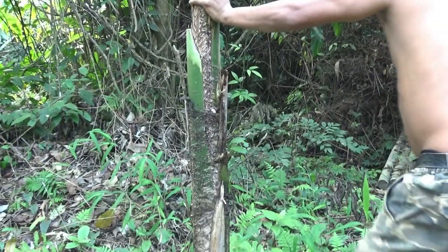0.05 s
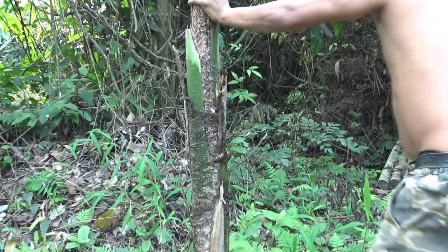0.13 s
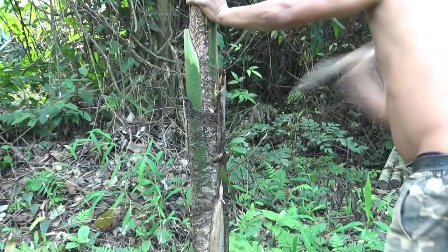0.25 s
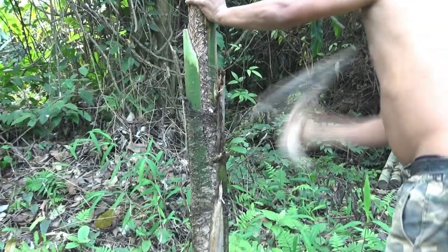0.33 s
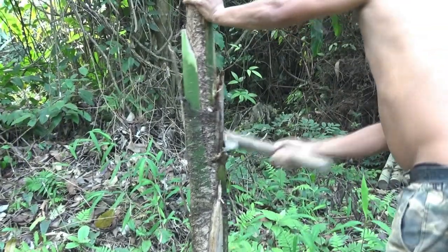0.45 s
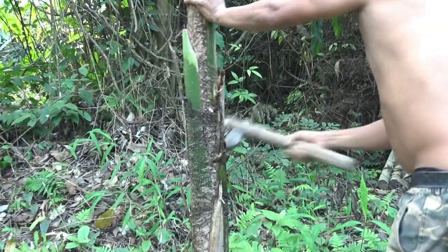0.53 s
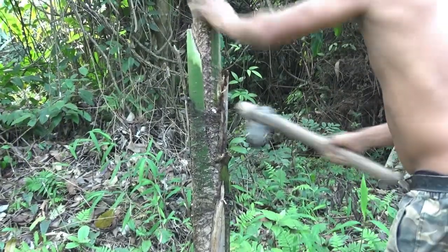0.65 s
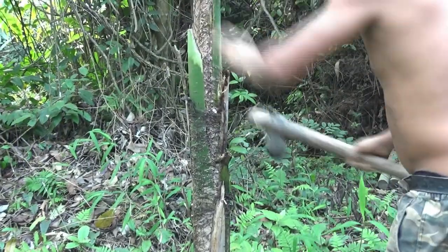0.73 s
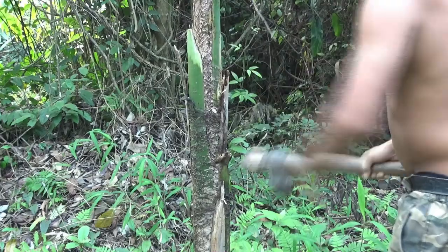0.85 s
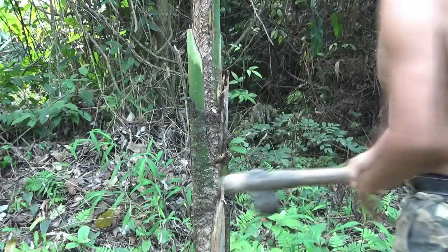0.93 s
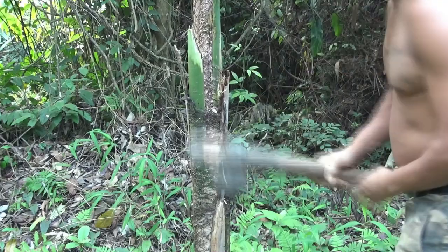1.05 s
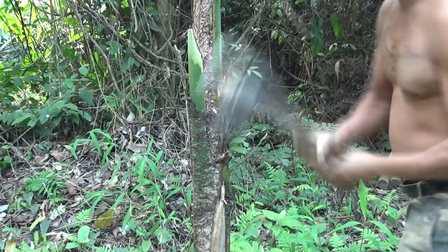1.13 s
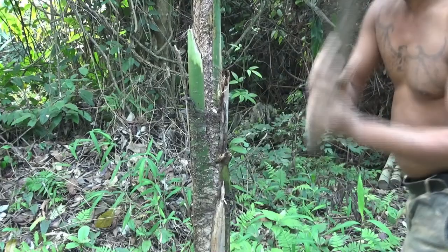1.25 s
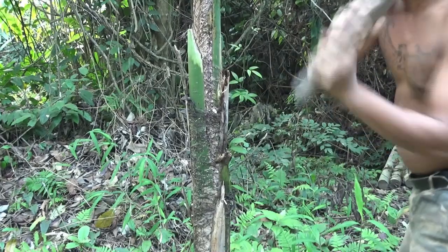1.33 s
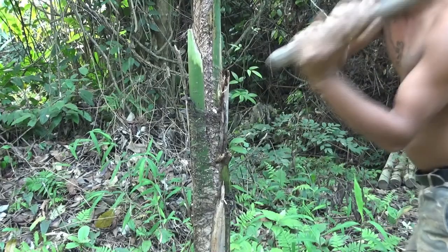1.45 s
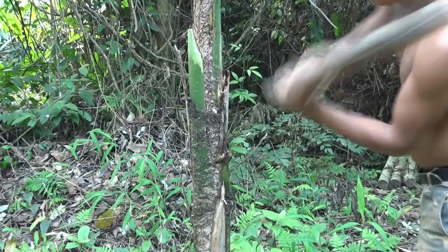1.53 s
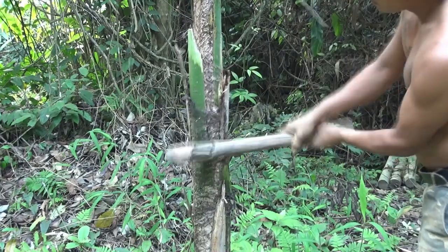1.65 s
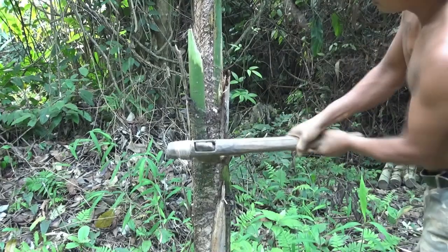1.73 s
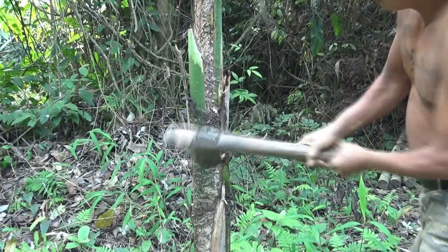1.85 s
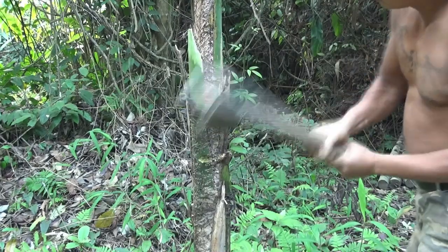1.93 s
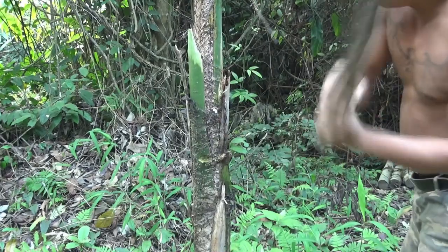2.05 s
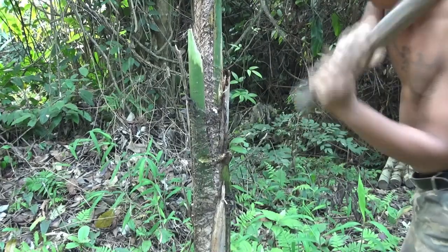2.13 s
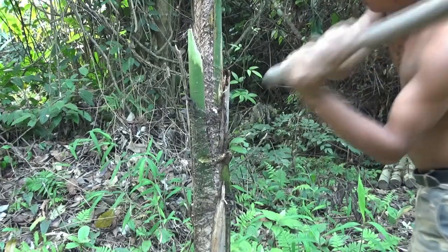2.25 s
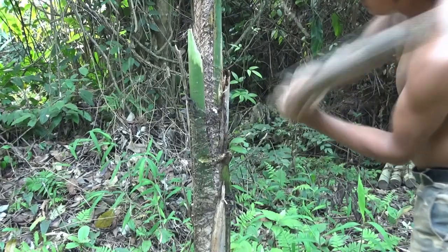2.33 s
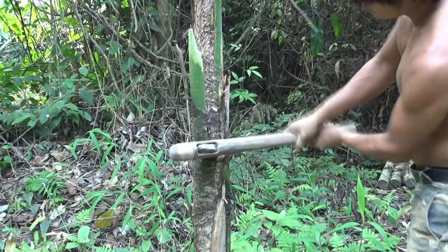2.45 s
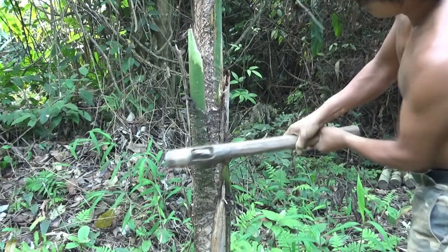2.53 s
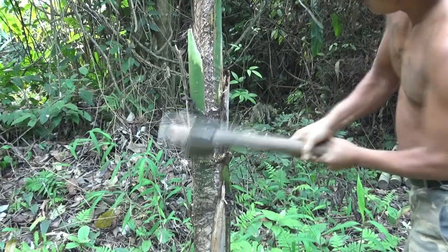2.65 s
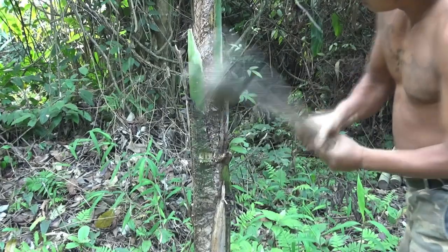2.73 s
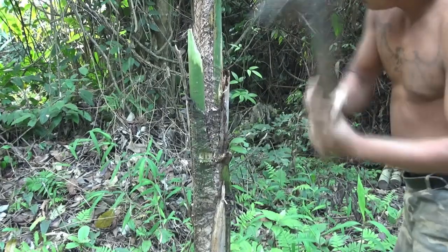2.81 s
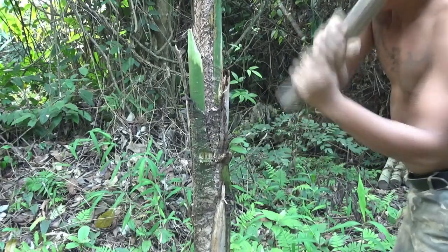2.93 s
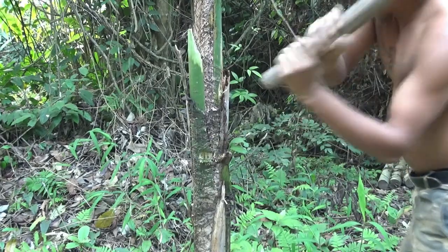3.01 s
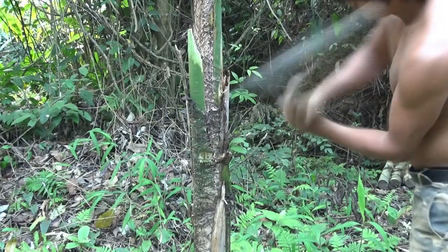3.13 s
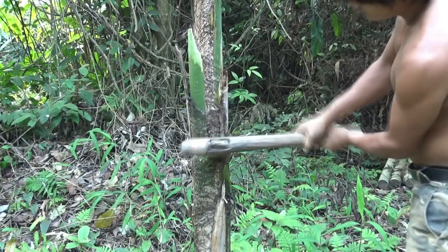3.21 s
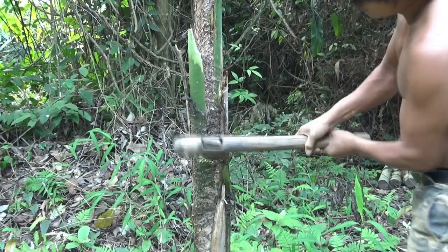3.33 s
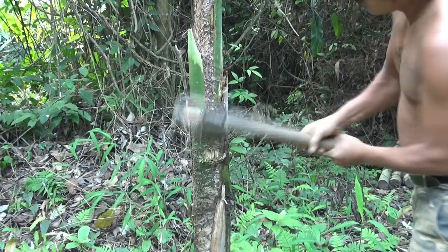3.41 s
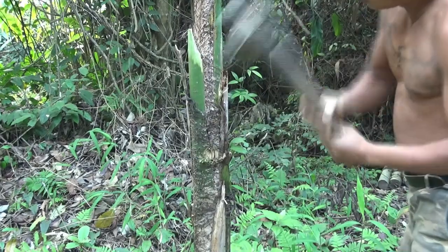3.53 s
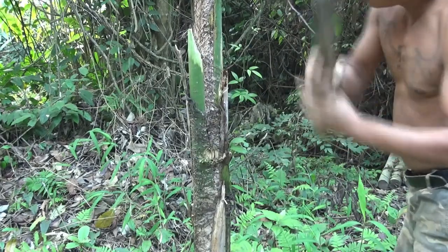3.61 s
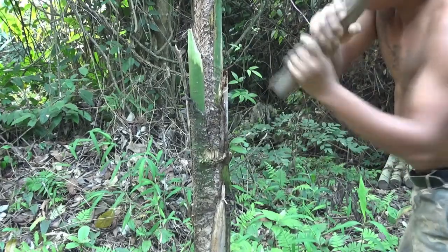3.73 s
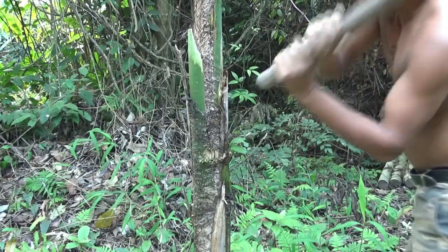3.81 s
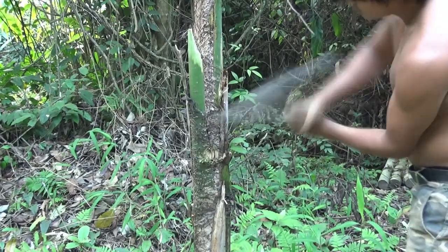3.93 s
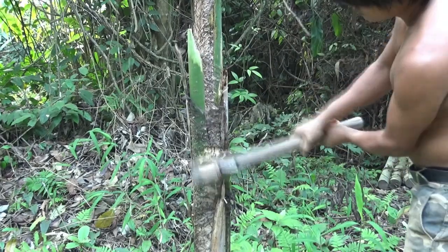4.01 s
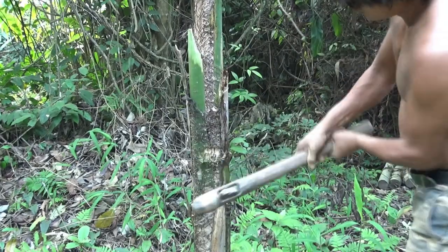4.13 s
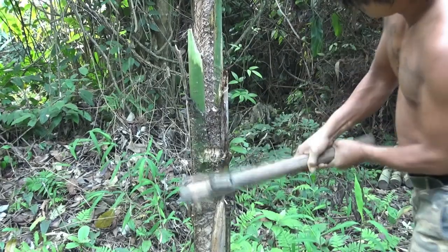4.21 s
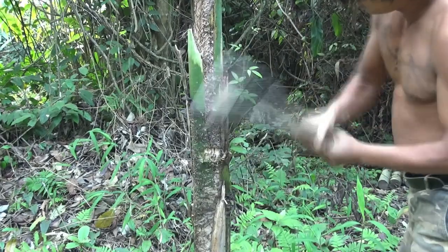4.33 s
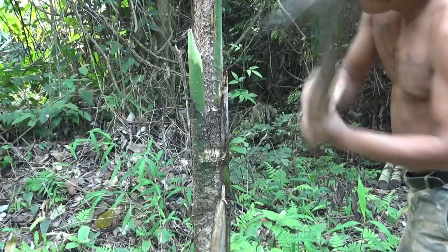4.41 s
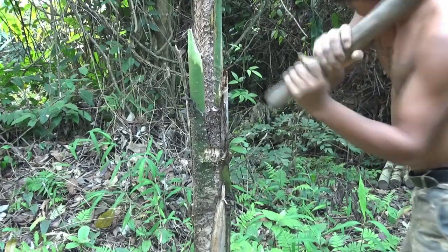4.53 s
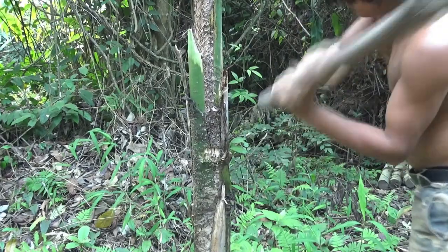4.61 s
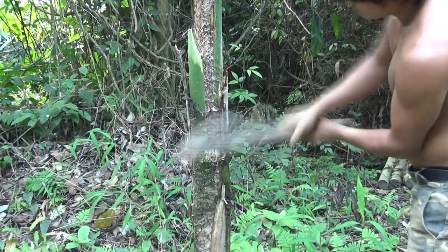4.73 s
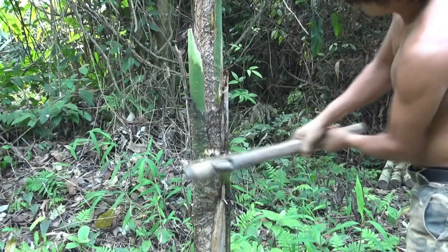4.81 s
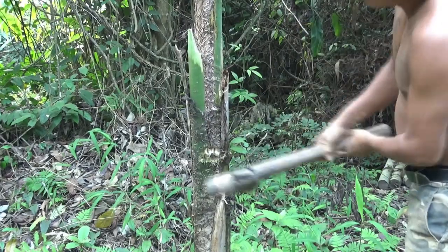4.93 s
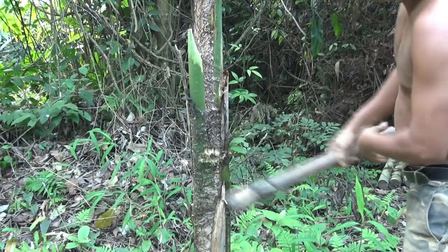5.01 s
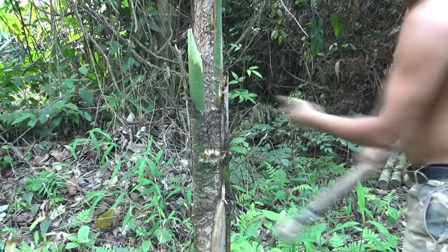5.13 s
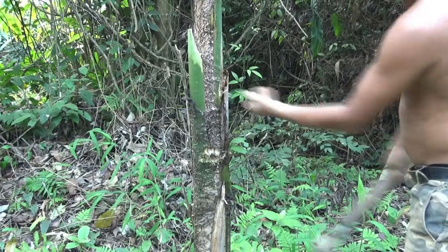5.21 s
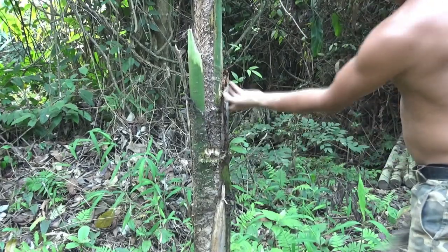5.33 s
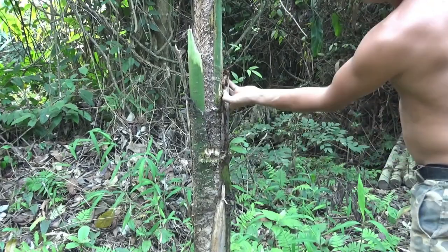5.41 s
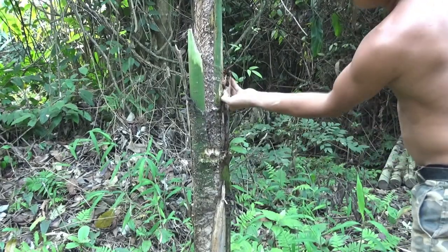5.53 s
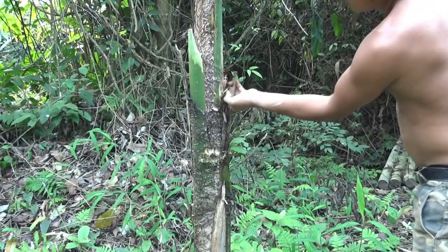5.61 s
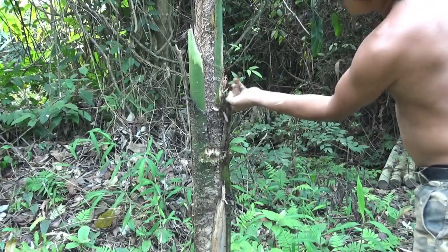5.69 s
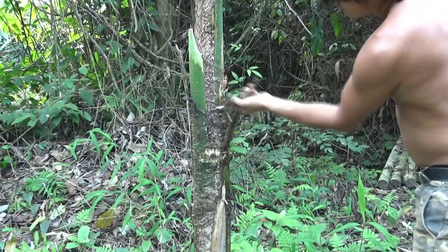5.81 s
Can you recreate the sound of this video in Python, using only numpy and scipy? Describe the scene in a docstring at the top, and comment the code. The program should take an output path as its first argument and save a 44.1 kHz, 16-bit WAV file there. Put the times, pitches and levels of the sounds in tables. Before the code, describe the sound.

In a quiet forest, a stone axe strikes a thin tree trunk close by. One knock comes first, then feet shuffle in dry leaves, and five sharp chops follow at a steady pace. Each blow echoes briefly among the trees, while twigs and chips snap in between. At the end, fingers pick at the bark with small crackles over a soft background hush.

```python
"""In a quiet wood, two steps away, a stone axe bites six times into a thin trunk.
Each blow crushes fibres and makes the trunk ring; the trees around throw the sound back
for most of a second. Feet shuffle in dry leaves, twigs and chips snap, and at the end
fingers pick at the bark. A soft hush lies under it all."""
import sys
import numpy as np
from scipy import signal
from scipy.io import wavfile
from scipy.ndimage import uniform_filter1d

SR = 44100
rng = np.random.default_rng(int(sys.argv[2]) if len(sys.argv) > 2 else 0)


def generate_wav(sig):
    """Save sig (samples, or channels by samples) to the path in sys.argv[1] as 16-bit PCM at SR."""
    pcm = np.round(np.clip(np.atleast_2d(sig).T, -1, 1) * 32767).astype(np.int16)
    wavfile.write(sys.argv[1], SR, pcm)


N = 258426

# Axe blows: t/s, crack level/dB, knock, thud and boom level/dB relative to the crack,
# favoured knock, thud and boom f/Hz, crushing time/s, echo level/dB
BLOWS = [(0.4371, -10.5, 8, -4, -26, 1830, 431, 248, 0.0069, -17.5),
         (1.7108, -1.5, -6, -14, -33, 1370, 890, 248, 0.0056, -18),
         (2.4956, 2, -7.5, -13, -33.5, 2150, 700, 199, 0.0037, -20),
         (3.266, 0.5, -6, -8.5, -31, 1250, 400, 185, 0.0039, -19.5),
         (4.0512, 1.5, -4.5, -16, -38.5, 2180, 570, 173, 0.0032, -17),
         (4.825, -6, 0.5, 1.5, -25.5, 2240, 780, 186, 0.005, -17.5)]
# Tones of the trunk: f/Hz, level/dB within its pitch group, 60 dB fade time/s
TRUNK_TONES = [(103, -6.5, 0.095), (144, 9.5, 0.044), (189.6, -11, 0.15), (303, 2, 0.13), (362, -1, .06),
               (452, 5, 0.088), (527, 26.5, 0.0057), (700, 8.5, 0.014), (820, 20.5, 0.015),
               (963, 15, 0.023), (1310, 15, 0.013), (1534, 7, 0.014), (1830, 21, 0.0044), (2240, 14, 0.017),
               (2440, 20, 0.011), (3400, 6, 0.0097), (4500, 15.5, 0.0096), (5340, 32, 0.0013),
               (7200, 6, 0.0027), (8000, 0, .002), (8980, 19.5, 0.0045), (12000, -30, .003)]
# How long the echo lasts: f/Hz, 60 dB fade time/s
ECHO_FADE = [(100, 0.86), (260, 0.58), (700, 0.73), (1840, 0.86), (4850, 1.06), (12800, 0.7)]
# Twigs, chips and bark breaking: t/s, level/dB, f/Hz, tick relative to ring/dB, left over right/dB
SNAPS = [(0.0582, -18, 2160, -3, 5), (0.161, -26.5, 1560, -5, 3), (0.1728, -20, 1900, 1, -3),
         (0.196, -26, 7850, 2, 0), (0.2862, -22.5, 2150, 8, -2), (0.5506, -19, 7500, 9, 2.5),
         (0.9894, -25, 3100, -7, -8), (1.211, -22, 7800, 4, -1.5), (1.2462, -10.5, 7210, -6, -1.5),
         (1.3234, -30, 8000, -5, 0), (1.4326, -25, 9150, -1.5, -4), (1.453, -26, 7500, -5, 3),
         (1.497, -38, 2640, 3, 0), (1.5774, -19.5, 7540, -1, 2), (1.5841, -21, 2000, 5, -8),
         (1.6, -20.5, 7340, -9, 1.5), (2.1304, -24, 1660, 0, -2.5), (2.3411, -32.5, 1450, -6, -1),
         (2.4206, -30.5, 7850, -7, 3), (2.9207, -21, 7660, -8, 2.5), (2.9344, -27, 4500, -12, -2.5),
         (3.7393, -33, 2340, 6, 0), (3.794, -26, 3400, -2, -1.5), (4.0756, -19, 2160, -5, -2.5),
         (4.4245, -32, 3220, 2, 0), (4.5184, -14.5, 2280, -9, 2.5), (4.5507, -27, 2750, -2.5, 0),
         (4.573, -32, 2700, -5, 0), (4.721, -25.5, 7900, 5, 4), (4.8497, -7, 3570, -7, 0),
         (4.8624, -7.5, 2060, -2, -1), (5.1971, -27.5, 2890, -7, 0), (5.2537, -28.5, 7400, -9, 5),
         (5.2975, -27.5, 6900, -5, 2.5), (5.3076, -27.5, 3500, -2.5, 4), (5.3632, -29.5, 2870, 6, 0),
         (5.3785, -24, 7830, -12, 4), (5.407, -31, 3100, 2.5, -2), (5.4408, -31, 3100, 1, -4),
         (5.4264, -30.5, 7740, -5, 0), (5.5004, -31.5, 4990, 1, 0), (5.5736, -31, 1920, 0, 0),
         (5.5935, -29, 7800, 6.5, -0.5), (5.6038, -29.5, 1900, 9, -1), (5.6552, -23, 1160, 5.5, -1.5),
         (5.687, -20.5, 2000, 2, 1), (5.7094, -27, 9200, -5, 2), (5.7373, -24, 2360, 0, -3),
         (5.7693, -18, 6100, 7.5, 1.5), (5.7887, -16.5, 2130, -5, -2.5), (5.8207, -20.5, 1920, -2, 0),
         (5.834, -24, 1960, 8, -2.5), (5.8493, -24, 2020, 5, 0)]
# Rustles of feet in dry leaves and, at the end, of bark being picked:
# loudest t/s, level/dB, 20 dB rise time/s, 20 dB fall time/s, crunch over rustle/dB
RUSTLES = [(0.004, -29, 0.03, 0.079, -2.5), (0.07, -38.5, .1, 0.28, -2), (0.245, -29.5, 0.16, 0.11, -5),
           (0.288, -33, 0.053, .03, -4.5), (0.36, -41.5, 0.22, 0.71, -0.5), (0.89, -37, 0.34, 0.43, 1),
           (0.98, -38, .07, 0.081, -6), (1.05, -36.5, 0.19, .15, -11), (1.125, -30.5, .12, 0.31, 2.5),
           (1.245, -30.5, .12, 0.19, -7), (1.36, -49, 0.12, 0.18, 3), (1.5, -42, 0.062, 0.71, -1.5),
           (2.13, -51, 0.45, 1, 2.5), (2.92, -52, 0.65, 0.67, 2), (3.75, -52, 1, 0.59, 1),
           (4.45, -51.5, 0.26, 0.63, 3), (4.555, -43, .015, 0.096, 1), (4.75, -52.5, 0.34, 0.21, 1.5),
           (5.4, -50, 0.72, 0.44, 0), (5.6, -43, 0.019, 0.075, 2), (5.66, -38.5, 0.014, 0.088, 1.5),
           (5.79, -38, 0.047, .2, 2.5), (5.85, -35, 0.13, 0.18, -2)]
# Tone colours (how strong each pitch is in a noise): f/Hz, relative level/dB
ECHO_COLOUR = [(29, -54), (50, -34), (98, -39.5), (345, -13), (380, -14.5), (532, -8), (1120, -8.5),
               (2380, -4), (3030, -6.5), (6240, -7.5), (14500, -17), (16000, -31)]
RUSTLE_COLOUR = [(1500, -19.5), (3000, -31), (5000, 2.5), (7500, 6), (10000, 3), (12500, -8.5),
                 (16000, -18)]
CRUNCH_COLOUR = [(150, -47), (400, -7), (800, -7), (1800, -1), (2800, -1), (4500, -3), (8000, -22)]
HUSH_COLOUR = [(18, -64), (30, -42), (95, -18), (145, -20), (245, -10.5), (866, -3.5), (937, -2.5),
               (1100, -8), (3490, -7.5), (3980, -10.5), (16000, -22.5)]
# How alike left and right sound: f/Hz, likeness (1 = the same)
ECHO_LIKENESS = [(60, 0.92), (180, 1), (550, 0.83), (1650, 0.87), (4970, 0.82), (15000, 0.95)]
RUSTLE_LIKENESS = [(60, 0.6), (240, 0.82), (950, 0.85), (3770, 0.91), (15000, 0.89)]
HUSH_LIKENESS = [(60, 0.57), (180, 0.97), (550, 0.11), (1650, 0.14), (4970, 0.74), (15000, 1)]

# Noise is shaped on a grid of these pitches and moments.
GRID_HZ = np.fft.rfftfreq(512, 1 / SR)[:, None]
GRID_S = np.arange(N // 128 + 5) * 128 / SR
BOOM_HZ, THUD_HZ, KNOCK_HZ = 260, 1100, 3000  # top of each pitch group; above them the trunk cracks


def axe_blows():
    """The edge crushes fibres, which shake the trunk; the spot it hits favours some tones."""
    out, t = np.zeros((2, N)), np.arange(7000) / SR
    contact = 35  # samples during which only bark gives way
    for s, crack_db, knock_db, thud_db, boom_db, knock_hz, thud_hz, boom_hz, crush_s, _ in BLOWS:
        middle, aside = rng.standard_normal((2, len(t)))
        ragged = middle + 0.25 * aside * [[1], [-1]]
        crush = 0.52 * ragged * np.exp(-t / crush_s)
        crush[:, :contact] *= 0.15
        crush[:, contact] += 2.6
        deep_crush = crush * np.exp(t / crush_s * (1 - 1 / 1.36))  # deep wood takes 1.36 times as long
        push = np.exp(-t / 0.0014)  # the heavy head shoves the whole trunk
        splits = crush * gain_of(3.5 * rng.standard_normal(len(t)))  # single fibres part unevenly
        splits[:, contact] = 4
        parts = np.zeros((4, 2, len(t)))  # boom, thud, knock, crack
        for hz, db, fade_s in TRUNK_TONES:
            group = np.searchsorted([BOOM_HZ, THUD_HZ, KNOCK_HZ], hz)
            octaves_off = abs(np.log2(hz / [boom_hz, thud_hz, knock_hz, hz][group]))
            drive = [push, deep_crush, crush, splits][group]
            parts[group] += gain_of(db - 8.5 * octaves_off) * ring(drive, hz, fade_s)
        parts[0] *= 1 - np.exp(-t / 0.025)  # the whole trunk takes a moment to swing
        parts[0] = cut_bass(parts[0], 100)
        parts[1] *= 1 - np.exp(-t / 0.00087)  # the thud swells behind the crack
        parts[2] *= 1 - 0.3 * np.exp(-t / 0.003)
        parts[1:] = cut_bass(cut_bass(parts[1:], 255), 255)
        parts /= abs(parts).max(axis=(1, 2), keepdims=True)
        blow = np.tensordot(gain_of([boom_db, thud_db, knock_db, 0]), parts, axes=1)
        add(out, s, gain_of(crack_db) * blow)
    return out * gain_of([[-0.2], [0.2]])


def tree_echoes():
    """Trunks and leaves scatter each blow into a wash of noise; each pitch fades at its own pace."""
    out, t = np.zeros((2, N)), np.arange(N) / SR
    tilt_db = -2.5 * np.log2((GRID_HZ + 100) / 2000)
    for turn in (0, 1):  # every other blow shares a wash, so each can start sharply
        gains, gate = np.zeros((len(GRID_HZ), len(GRID_S))), np.ones(N)
        for s, *_, echo_db in BLOWS[turn::2]:
            age = GRID_S - s
            faded_db = 60 * np.maximum(age, 0) / look_up(ECHO_FADE, GRID_HZ)
            gains = np.where(age > -0.02, gain_of(echo_db + tilt_db - faded_db), gains)
            build_up = 1 - np.exp(-np.maximum(t - s, 0) / 0.0089)
            gate = np.where(t > s - 0.05, build_up, gate)
        out += gate * noise(gains * colour(ECHO_COLOUR), ECHO_LIKENESS, patchy_db=0.99, flicker_db=1)
    return out


def snaps():
    """A short ragged burst rings the piece that breaks, with a dry tick on top."""
    out, t = np.zeros((2, N)), np.arange(2500) / SR
    rows = SNAPS + faint_snaps()
    bursts = rng.standard_normal((len(rows), len(t)))
    bursts *= np.exp(-t / 0.0006) + 0.6 * gain_of(-60 * t / 0.023)  # a hard break, then splinters
    bursts[:, 0] = 4.1
    bright = signal.butter(3, [3000, 12500], "band", fs=SR)
    for (s, db, hz, tick_db, left_db), burst in zip(rows, bursts):
        body = ring(burst, hz, 16 / hz)
        if hz < 4800:
            body += ring(burst, 2 * hz, 7 / hz)
        tick = signal.lfilter(*bright, burst)
        snap = body / abs(body).max() + gain_of(tick_db) * tick / abs(tick).max()
        add(out, s, gain_of(db) * snap * gain_of([[left_db / 2], [-left_db / 2]]))
    softened = signal.lfilter(*signal.butter(2, 12500, fs=SR), out)
    return cut_bass(softened, 810)  # small things give off little bass


def faint_snaps(count=40):
    """Extra rows like those in SNAPS, for tiny breaks at random times."""
    when, strength, pitch, side = rng.random((count, 4)).T
    db = -46 + 10 * strength
    hz = 2200 * (9000 / 2200) ** pitch
    tick_db, left_db = np.full(count, -3), 4 * (2 * side - 1)
    return list(zip(when * N / SR, db, hz, tick_db, left_db))


def rustles():
    """Dry leaves and bark rustle and crackle; each movement has its own share of lower crunch."""
    power = np.zeros((len(GRID_HZ), len(GRID_S)))
    rustle_power = np.zeros(len(GRID_S))
    rustle, crunch = colour(RUSTLE_COLOUR), colour(CRUNCH_COLOUR)
    for s, db, rise_s, fall_s, crunch_db in RUSTLES:
        from_peak = np.where(GRID_S < s, (s - GRID_S) / rise_s, (GRID_S - s) / fall_s)
        level = gain_of(db - 20 * np.minimum(from_peak, 10))
        power += level ** 2 * (rustle ** 2 + (crunch * gain_of(crunch_db)) ** 2)
        rustle_power += level ** 2
    rustle_level = np.interp(np.arange(N) / SR, GRID_S, np.sqrt(rustle_power))
    crackle = gain_of(-13) * rustle_level * dry_crackle()
    return crackle + noise(np.sqrt(power), RUSTLE_LIKENESS, patchy_db=1.28, flicker_db=2.26)


def dry_crackle(per_second=500):
    """Small dry pieces break in ticks of uneven size, each ringing one of eight brittle pitches."""
    size = gain_of(0.69 * np.minimum(rng.exponential(1, N), 5))
    size *= rng.random(N) < per_second / SR
    piece, side = rng.integers(0, 8, N), rng.uniform(-0.79, 0.1, N)
    ticks = np.array([size * (1 + side), size * (1 - side)])
    pitches = np.geomspace(1500, 11000, num=8)
    crackle = sum(ring(ticks * (piece == k), hz, 14 / hz) for k, hz in enumerate(pitches))
    return unit_level(cut_bass(crackle, 780))


def wood_hush():
    """The soft, steady noise of the wood in the background."""
    return gain_of(-50) * noise(colour(HUSH_COLOUR), HUSH_LIKENESS, patchy_db=3.85, flicker_db=0.17)


def gain_of(db):
    """Turns decibels into a number to multiply by."""
    return 10 ** (np.asarray(db) / 20)


def unit_level(x):
    """Scales x so that its average size (rms) is 1."""
    return x / np.sqrt(np.mean(x ** 2) + 1e-20)


def look_up(table, hz):
    """Reads a table at any pitch, sliding between its rows."""
    f, value = np.transpose(table)
    return np.interp(np.log(hz + 1), np.log(f + 1), value)


def colour(table):
    """Turns a tone colour into one gain for each pitch of the grid."""
    return unit_level(gain_of(look_up(table, GRID_HZ)))


def add(mix, s, sound):
    """Mixes a sound in, starting at s seconds."""
    part = mix[..., round(s * SR):][..., :sound.shape[-1]]
    part += sound[..., :part.shape[-1]]


def ring(drive, hz, fade_s):
    """One tone, set ringing by the drive, that dies by 60 dB in fade_s."""
    pole = np.exp(2j * np.pi * hz / SR - np.log(1000) / (fade_s * SR))
    return signal.lfilter([1], [1, -pole], drive).imag


def cut_bass(x, hz):
    """Weakens everything below hz."""
    return signal.lfilter(*signal.butter(2, hz, "high", fs=SR), x)


def noise(gains, likeness, patchy_db, flicker_db):
    """Stereo noise shaped by the gains, with random louder patches and a flicker of the whole sound."""
    a, b, c, d, patches = rng.standard_normal((len(GRID_S), len(GRID_HZ), 5)).T
    patches = uniform_filter1d(patches, size=8, axis=0)
    patches = unit_level(uniform_filter1d(patches, size=8, axis=1))
    flicker = rng.exponential(1, len(GRID_S)) - 1
    unevenness = unit_level(gain_of(patchy_db * patches + flicker_db * flicker))
    alike = look_up(likeness, GRID_HZ)
    left = a + 1j * b
    right = alike * left + np.sqrt(1 - alike ** 2) * (c + 1j * d)
    shaped = np.array([left, right]) * unevenness * gains
    plain_level = signal.istft(left, nperseg=512, noverlap=384)[1].std()
    return signal.istft(shaped, nperseg=512, noverlap=384)[1][:, :N] / plain_level


def scene():
    """The axe, its echo and the small sounds over the hush of the wood."""
    return wood_hush() + axe_blows() + tree_echoes() + rustles() + snaps()


def record(dry):
    """Moves the high treble to the middle, rounds off loud peaks and cuts the very highest pitches."""
    narrow_hz, top_hz, ceiling = 10900, 15900, 1.15
    side = signal.filtfilt(*signal.butter(2, narrow_hz, fs=SR), (dry[0] - dry[1]) / 2)
    narrowed = dry.mean(axis=0) + side * [[1], [-1]]
    rounded = ceiling * np.tanh(narrowed / ceiling)
    top_cut = signal.firwin(511, top_hz, window=("kaiser", 9), fs=SR)
    return signal.oaconvolve(rounded, top_cut[None], "same")


dry = scene()
out = record(dry)
generate_wav(out)
```